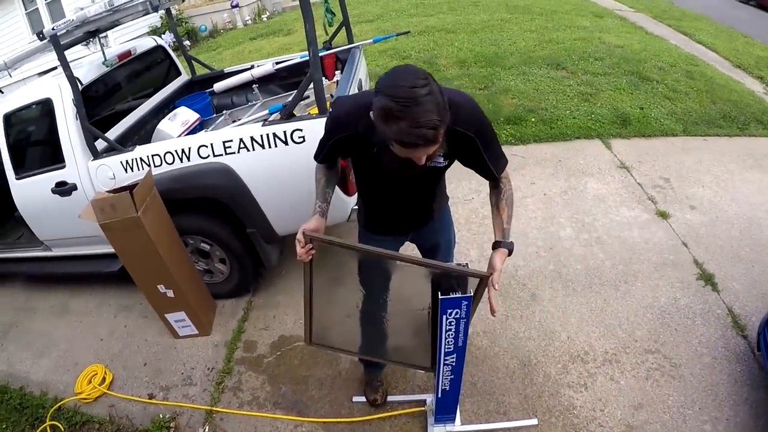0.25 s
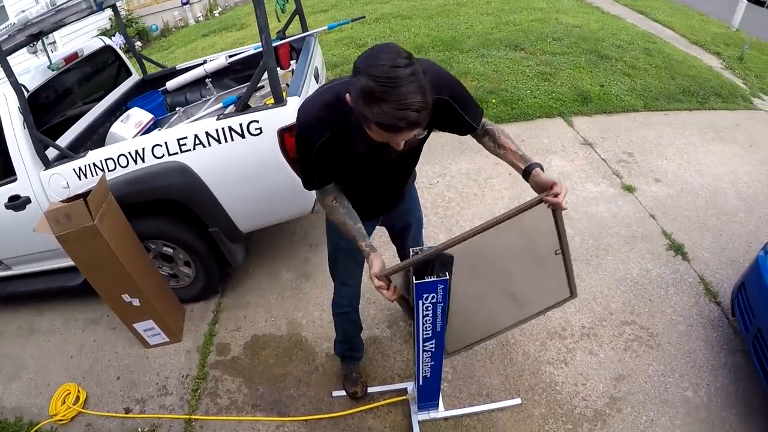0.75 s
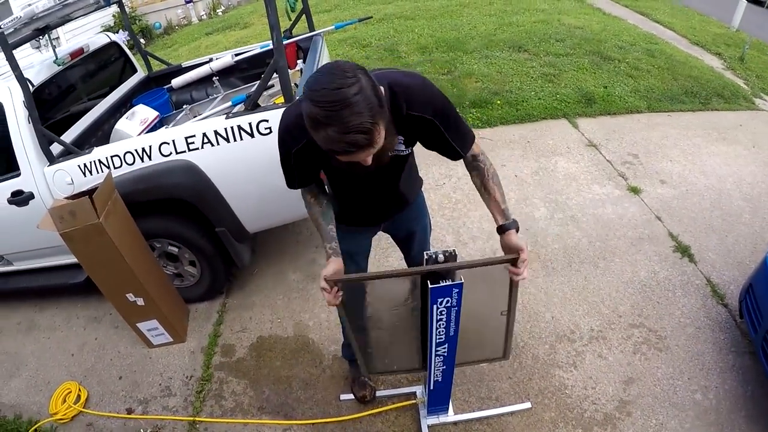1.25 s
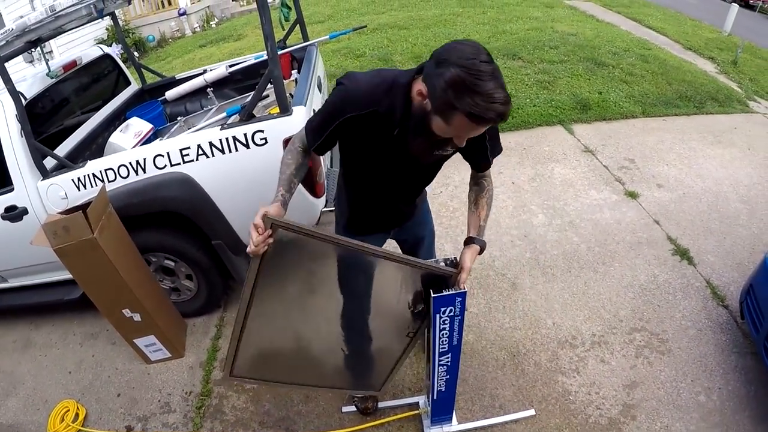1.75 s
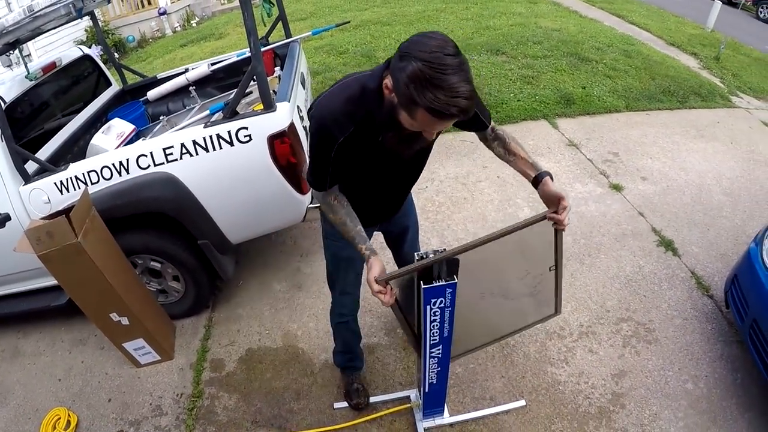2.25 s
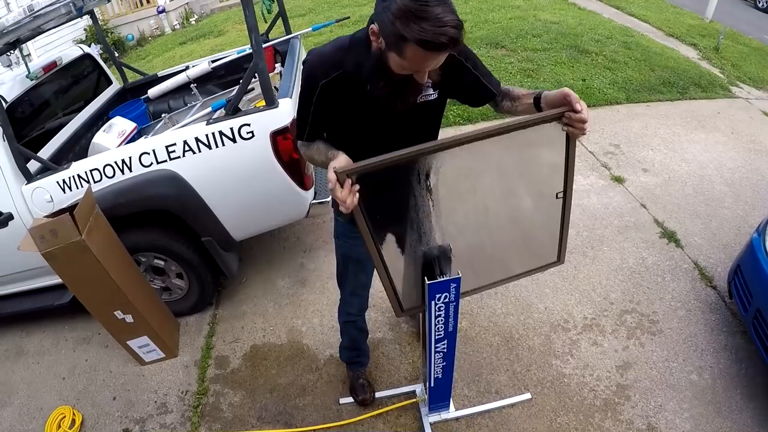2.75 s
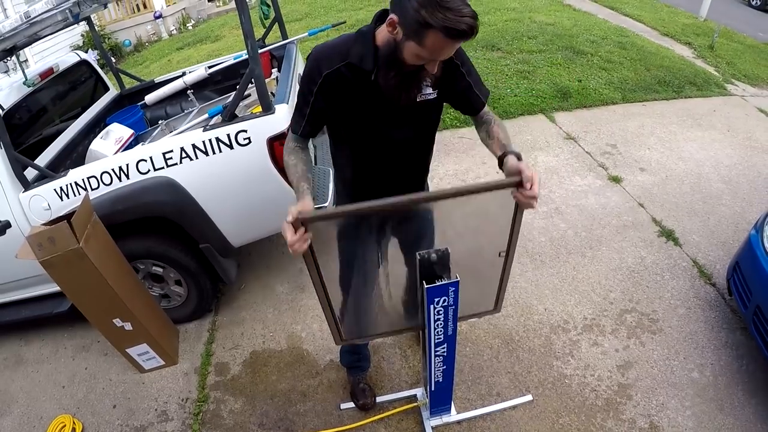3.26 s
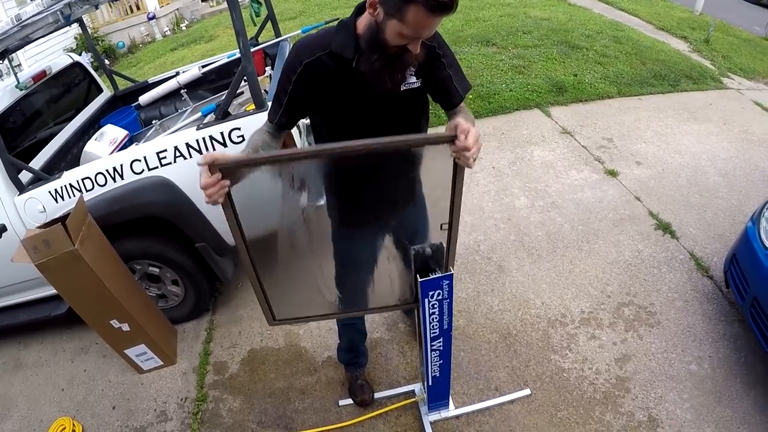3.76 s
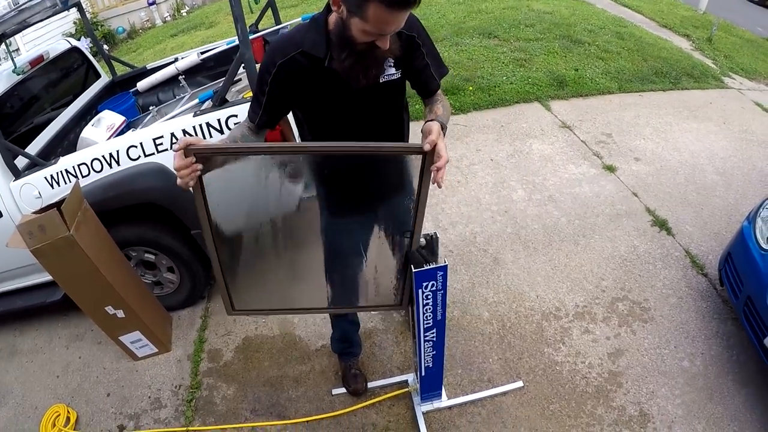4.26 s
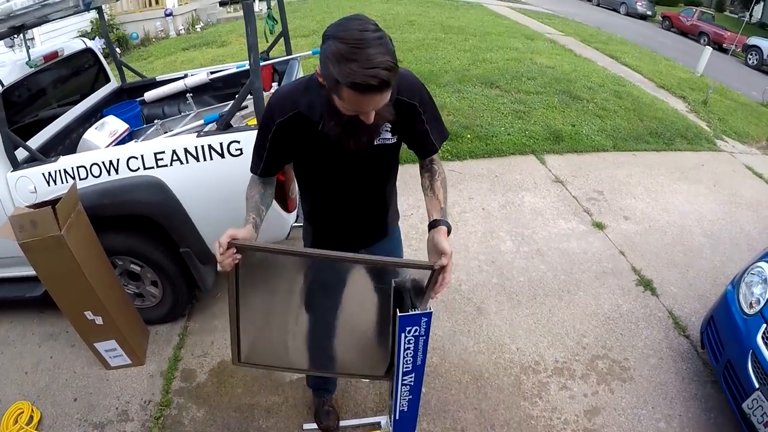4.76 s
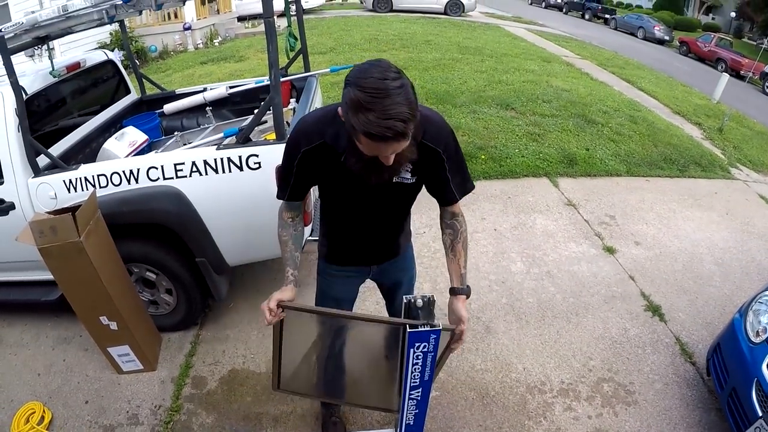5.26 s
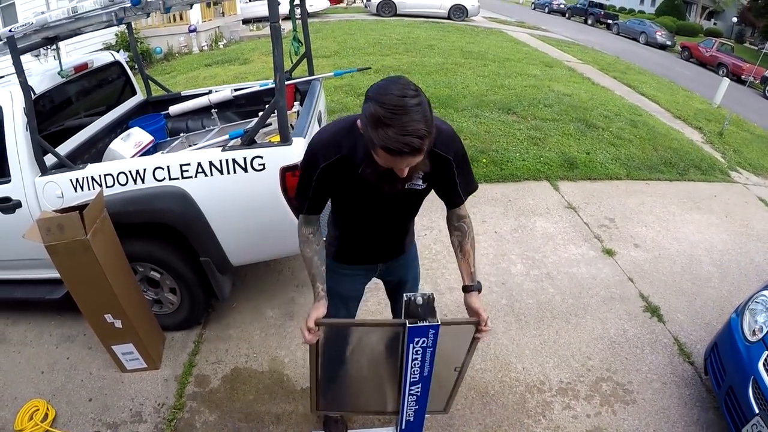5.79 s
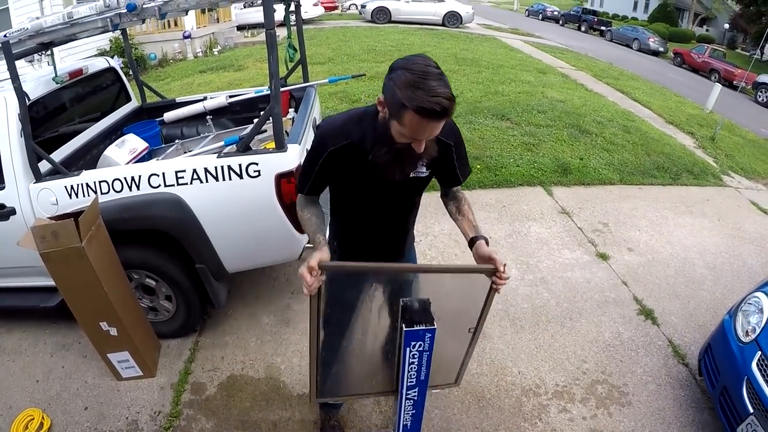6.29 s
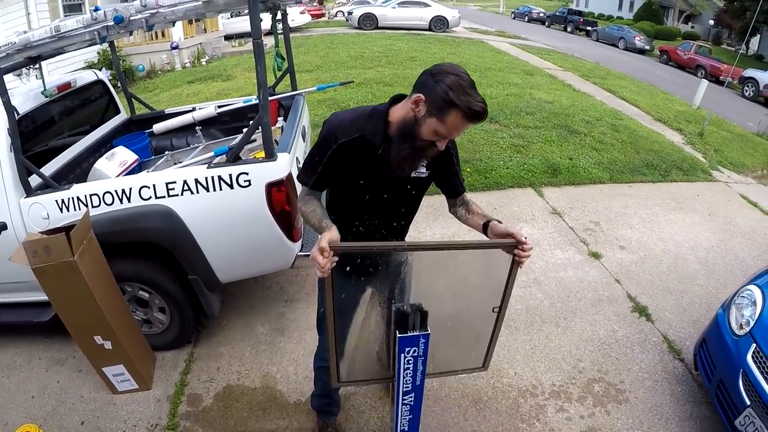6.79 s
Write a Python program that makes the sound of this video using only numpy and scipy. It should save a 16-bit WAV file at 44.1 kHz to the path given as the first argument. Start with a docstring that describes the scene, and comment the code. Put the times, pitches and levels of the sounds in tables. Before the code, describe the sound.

Rhythmic scrubbing of a wire screen begins at once, with dry-edged, scratchy swishes and short, quickly damped metallic knocks. In the first four seconds a few strokes give raspy zipping tones; afterwards the strokes turn faster, steadier and brighter. Low soft thumps come from the post. The microphone is close, in stereo, in open air with little bass and a faint street hum behind.

```python
"""A framed insect screen is pushed to and fro between the wet brushes of a scrubbing post on a driveway.
From the start, random bristle flicks hiss stroke by stroke over a quiet street hum, both made of shaped noise.
Almost at once the thin metal frame starts knocking on the post: noise bursts and fading sine waves.
From half a second to four seconds some strokes zip, with a tone at the mesh wires passed per second.
Dull low bumps of the post join before two seconds. A camera with two ports listens."""
import sys
import numpy as np
from scipy import signal
from scipy.fft import rfft, irfft, next_fast_len
from scipy.io import wavfile
from scipy.ndimage import uniform_filter1d

SR = 44100
rng = np.random.default_rng(int(sys.argv[2]) if len(sys.argv) > 2 else 0)


def invert_db(level):
    """Linear amplitude ratio for a level in decibels (20 dB per decade), elementwise."""
    return 10 ** (np.asarray(level, dtype=float) / 20)


def transcribe(u):
    """Save the signal u as a 16-bit wav file named by the first command-line argument.

    u: samples, shape (n,) or (channels, n), limited to [-1, 1]; the rate is SR.
    q: integer samples, one column per channel.
    """
    v = np.clip(np.atleast_2d(u).T, -1, 1)
    q = np.round(v * 32767).astype(np.int16)
    wavfile.write(sys.argv[1], SR, q)


N = 310023  # length in samples, about 7 s

# Strokes of the screen, one row each: start t/s, speeding up/s, slowing down/s, top strength/dB,
# frame body against the hiss at the top of the stroke/dB, firmness (1 pointed, 3 flat-topped)
STROKE_ROWS = [(-.2, 0.35, 0.14, -25.5, 1.5, 2.6), (.3, 0.14, 0.079, -33, -9, 3.6),
               (.5, 0.21, 0.24, -25, -1.5, 3.3), (1.07, 0.26, 0.27, -24.5, -0.2, 2.13),
               (1.56, 0.093, 0.17, -32.5, -1, 1.5), (1.87, .35, .22, -25, -1, 2.27),
               (2.33, .36, 0.48, -29, -6.5, 3.4), (3.18, 0.19, 0.079, -23, -5.5, 2),
               (3.5, 0.089, 0.18, -24, -3.5, 2.2), (3.81, 0.12, 0.1, -23, -5, 2.8),
               (4.05, 0.15, 0.13, -28.5, -3, 1.76), (4.361, .12, 0.19, -26.5, -8, 1.47),
               (4.66, .2, .15, -29, -4.5, 1.75), (5.02, 0.09, .25, -26, -7, 1.24),
               (5.39, 0.092, 0.16, -24, -7.5, 2.03), (5.692, 0.12, 0.16, -23, -4.5, 2.33),
               (5.991, 0.14, 0.19, -23, -5, 1.93), (6.35, .1, 0.14, -22, -5.5, 2.6),
               (6.631, .12, 0.17, -21, -8, 1.93), (6.95, 0.13, .15, -24.5, -9.5, 1.9)]
# First colour of the brushes, the main one in the first half: f/Hz, relative level/dB per Hz
FIRST_COLOUR = [(180, -32), (400, -21), (700, -17.5), (900, -14.5), (1150, -7.5), (1700, -3.5), (2050, -6),
                (2400, -7), (2950, -6.5), (3500, -3), (4300, -2), (5300, -6.5), (6400, -9.5), (9000, -19.5),
                (11500, -28.5), (13500, -28.5), (14900, -38)]
# Second colour of the brushes, strongest toward the end: f/Hz, relative level/dB per Hz
SECOND_COLOUR = [(180, -57), (300, -9), (371, -17), (540, -22.5), (800, -14), (958, -10), (1560, -6.5),
                 (1970, 0), (2280, -9), (3260, -8.5), (3720, -2.5), (4520, -1), (9140, -19.5),
                 (13500, -21.5), (14900, -32)]
# Share of the second colour: t/s, share (0-1)
SECOND_SHARE = [(0, 0.38), (2.4, 0.21), (3.3, 0.2), (4.5, 0.3), (5.4, 0.75), (7.03, 0.83)]
# Treble fizz against the hiss, before it follows the strength: t/s, level/dB
FIZZ = [(0, -1.2), (1.6, 1.1), (3.1, 3.5), (5.3, 1), (7.03, -2)]
# Street, as heard behind the camera's bass cut: f/Hz, relative level/dB per Hz
STREET_COLOUR = [(20, -21), (40, -27), (80, -26), (112, -47), (128, -32), (145, -5.5), (165, 4), (200, -1),
                 (285, -3.5), (296, -0.5), (310, -2.5), (600, -8), (1000, -9), (1700, -19), (3000, -36),
                 (5000, -60)]
# Knocks of the frame on the post: t/s, peak level/dB, centre of the ring f/Hz,
# treble level/dB, contact length/ms
KNOCK_ROWS = [(0.0535, -9.5, 1680, -14, 3.9), (0.192, -15.5, 1710, -17, 4.6), (0.3536, -23, 1720, -9, 2.4),
              (1.1477, -10, 1900, -7, 1.6), (1.298, -14, 1670, -25, 6.7), (1.7483, -15.5, 1860, -9, 3.1),
              (1.7825, -9, 1590, -9, 3.0), (2.6322, -6, 1850, -23, 3), (2.7259, -18.5, 1850, -20, 2.4),
              (3.481, -20, 1680, -7, 1.6), (3.517, -26.5, 1230, -2, 2.4), (3.6753, -17, 1830, -15, 4),
              (4.2305, -9, 2600, -18, 3.7), (4.304, -33, 1650, -16, 4), (4.6732, -18, 2110, -5, 0.85),
              (4.7162, -12.5, 1420, 1, 1.1), (4.7902, -9.5, 1750, -15, 3.4), (4.8357, -16.5, 1300, -4, 3.0),
              (4.8935, -19, 1780, -12, 2.5), (4.9542, -10, 1790, -8, 1.9), (4.997, -26.5, 1660, -12, 3.0),
              (5.0145, -28, 1790, -9, 2.3), (5.515, -27, 1740, -8, 2.1), (5.5667, -18, 1840, -3, 3.8),
              (5.6708, -26, 1770, -15, 3.4), (6.2806, -8, 2500, -14, 3.3), (6.7594, -25, 2860, -1, 2.1),
              (6.847, -11, 1800, 3, 3.2)]
# Ways the frame rings: f/Hz, relative level/dB, time to fade by 60 dB/s
FRAME_MODES = [(549, -1.5, 0.21), (1360, 2, 0.073), (1680, 11, 0.036), (1850, 3.5, 0.046), (2135, 7, 0.039),
               (2400, -1.5, 0.044), (2633, 1.5, 0.038), (3230, 8.5, 0.029), (3556, 5, 0.033),
               (3800, -16.5, 0.047), (5000, -6, 0.017), (5460, -33, .03), (7115, -29, 0.066)]
# Bristles in step on the mesh, one curve a zip: t/s, wires per second f/Hz, level/dB
ZIP_CURVES = [
    [(.6, 1055, -38), (.63, 1105, -40), (.67, 1160, -30)],
    [(.545, 761, -32), (.575, 918, -30), (.6, 1102, -40), (.645, 1503, -28.5), (.66, 1568, -30.5),
     (.7, 1550, -32), (.73, 1438, -28.5), (.77, 1247, -36), (.84, 890, -54)],
    [(.905, 633, -42), (.955, 640, -45)],
    [(1.2, 1254, -34), (1.31, 1453, -38), (1.36, 1350, -37), (1.42, 1555, -38), (1.48, 1370, -26)],
    [(2.08, 1241, -42), (2.13, 1295, -27), (2.17, 1233, -32), (2.2, 1325, -26.5), (2.235, 1280, -38),
     (2.26, 1323, -24), (2.3, 1206, -36), (2.34, 1190, -30)],
    [(3.3, 1089, -35), (3.358, 1302, -35), (3.378, 1215, -30.5), (3.4, 1150, -39)],
    [(2.06, 1850, -26), (2.18, 1955, -39), (2.32, 1850, -36)],
    [(3.56, 1600, -31), (3.63, 1766, -37), (3.65, 1700, -42)],
    [(3.89, 1230, -50), (3.935, 1250, -32), (3.95, 1200, -46)],
]
# How far the bristles are out of step: one value a zip (0-1)
OUT_OF_STEP = [.3, .12, .05, .95, .35, .1, .95, .95, .3]
# The post rocks on its feet or hums: t/s, starting level/dB, f/Hz, time to fade by 60 dB/s
BUMP_ROWS = [(1.783, -37.5, 550, 0.19), (2.046, -25.5, 182, 0.048), (3.561, -23, 162, 0.042),
             (5.285, -24, 182, .052), (6.118, -33.5, 362, 0.056), (6.741, -28.5, 375, .052)]
# Left port against right: f/Hz, louder/dB, leads/radians, likeness (0-1)
PORT_ROWS = [(150, -0.6, -0.13, 0.37), (450, -2.8, -0.43, 0.52), (800, -4.7, -0.14, 0.2),
             (1150, -9.5, 1.19, 0.57), (1500, -3.6, 1.38, 0.85), (2000, -0.9, 0.96, 0.86),
             (2400, 1.9, 0.47, 0.59), (2900, -1.4, 0.08, 0.86), (4300, 0.1, -0.12, 0.93),
             (5200, 1.2, -0.64, 0.71), (6500, 0.9, -0.15, 0.54), (7500, 1.3, -0.63, 0.27),
             (8600, -5.3, 0.26, 0.32), (10200, -13.3, 2.01, 0.14), (11200, -10.4, -0.05, 0.22),
             (12600, -2.5, -0.14, 0.56), (14500, 0.2, -0.3, 0.39)]

FLICKS_PER_S = 16000  # in each of two crowds of bristles
ENDS_DB = -17  # strength lost toward both ends of a stroke
REST_DB, BODY_REST_DB = -41, -44  # rustle left at the turns: hiss, frame body
BODY_EARLY_DB = 1.5  # the frame body leads: extra level before the top of a stroke
BODY_FIRMER = 1.34  # the body bites and stops more abruptly: factor on firmness
THUD_DB, DULL_THUD_DB = -25, -7.5  # thud against the peak: ordinary knocks, low-ringing knocks
DULL_UNDER_HZ = 1450  # knocks that ring below this thud much more


def evened(x):
    """Scales to an average strength (rms) of 1."""
    return x / np.sqrt(np.mean(x ** 2) + 1e-20)


def read_colour(points, hz):
    """Reads a colour table on a log-frequency axis."""
    f, value = np.transpose(points)
    return np.interp(np.log(hz + 1), np.log(f + 1), value)


def read_curve(points, t):
    """Reads a table of values over time."""
    return np.interp(t, *np.transpose(points))


def mix_in(mix, s, sound):
    """Mixes a sound in at s seconds."""
    part = mix[max(round(s * SR), 0):][:len(sound)]
    part += sound[:len(part)]


def step(hz, edge_hz, octaves):
    """Climbs smoothly from 0 to 1 across an edge in frequency."""
    return .5 + .5 * np.tanh(np.log2((hz + 1) / edge_hz) / octaves)


def patches(shape, bins, frames):
    """Random blotches over frequency and time, rms 1."""
    noise = rng.standard_normal(shape[::-1]).T
    wide = uniform_filter1d(noise, bins, 0)
    return evened(uniform_filter1d(wide, frames, 1))


def strokes(t):
    """Rubbing strength and the body against it, in dB: strokes swell and sink over the rustle at rest."""
    start, rise, fall, top_db, body_db, firm = np.transpose(STROKE_ROWS)[:, :, None]
    top_s = start + rise
    # distance from the top of the stroke: 0 at the top, 1 at either end
    early = np.maximum(top_s - t, 0) / rise
    late = np.maximum(t - top_s, 0) / fall
    hiss = invert_db(top_db + ENDS_DB * (early + late) ** firm)
    lead_db = BODY_EARLY_DB * np.minimum(early, 1)
    body_ends_db = ENDS_DB * np.minimum(early + late, 3) ** (firm * BODY_FIRMER)
    body = invert_db(top_db + body_db + lead_db + body_ends_db)
    hiss_db = 10 * np.log10((hiss ** 2).sum(0) + invert_db(REST_DB) ** 2)
    total_body_db = 10 * np.log10((body ** 2).sum(0) + invert_db(BODY_REST_DB) ** 2)
    return hiss_db, total_body_db - hiss_db


def brush(patchy_db=1.56, catch_db=0.12):
    """Thousands of bristle flicks a second, coloured by mesh and frame, in two unrelated crowds."""
    sizes = invert_db(1.2 * np.minimum(rng.exponential(1, (N, 2)), 4))
    happens = rng.random((N, 2)) < FLICKS_PER_S / SR
    flicks = happens * rng.standard_normal((N, 2)) * sizes
    hz, t, z = signal.stft(evened(flicks.T), SR, nperseg=512, noverlap=384)
    strength_db, body_db = strokes(t)

    share = read_curve(SECOND_SHARE, t)
    first_db = np.outer(read_colour(FIRST_COLOUR, hz), 1 - share)
    colour_db = first_db + np.outer(read_colour(SECOND_COLOUR, hz), share)
    # level both colours by their hiss region, so the stroke strength sets the hiss
    hiss = (hz > 3000) & (hz < 6500)
    colour_db -= 10 * np.log10(np.sum(invert_db(colour_db[hiss]) ** 2, 0) / len(hz))

    # the body also grows with the second colour
    body = np.outer(1 - step(hz, 2600, 0.68), body_db + 3.2 * share)
    # the fizz swells less than the hiss
    fizz_db = read_curve(FIZZ, t) - 0.095 * (strength_db + 39.5)
    tips = np.outer(step(hz, 8100, 0.3), fizz_db)
    # tufts catch and let go: narrow blotches, then wide ones
    chance_db = patchy_db * patches(z[0].shape, 6, 8) + catch_db * patches(z[0].shape, 90, 5)
    z = z * invert_db(colour_db + body + tips + chance_db)
    shaped = signal.istft(z, SR, nperseg=512, noverlap=384)[1][:, :N]
    return shaped * invert_db(np.interp(np.arange(N) / SR, t, strength_db))


def street(patchy_db=2.0):
    """Far traffic and air as coloured, blotchy noise, partly alike at both ports."""
    hz = np.fft.rfftfreq(2048, 1 / SR)
    a, b, c, d = rng.standard_normal((N // 512 + 6, len(hz), 4)).T
    shared, separate = a + 1j * b, c + 1j * d
    # the ports agree more in the deep bass
    same = (0.35 + .4 * (1 - step(hz, 50, .5)))[:, None]
    z = np.array([shared, same * shared + np.sqrt(1 - same ** 2) * separate])
    z *= invert_db(read_colour(STREET_COLOUR, hz)[:, None] + patchy_db * patches(a.shape, 8, 10))
    hum = signal.istft(z, nperseg=2048, noverlap=1536)[1][:, :N]
    return invert_db(np.array([[-46.5], [-45.5]])) * evened(hum)  # left, right level in dB


def band(x, lo_hz, hi_hz):
    """Keeps the part between two frequencies, with steep edges, and scales its peak to 1."""
    y = signal.sosfilt(signal.butter(4, [lo_hz, hi_hz], "band", fs=SR, output="sos"), x)
    return y / abs(y).max()


def knock(row, draw, spread_db=3.5, crack_db=-1.5, crack_t60=0.05, thud_t60=0.09):
    """A short contact gives a bright crack and a dull thud; the frame rings most near the centre pitch."""
    s, peak_db, centre_hz, treble_db, contact_ms = row
    ordinary = step(centre_hz, DULL_UNDER_HZ, 0.044)
    thud_db = DULL_THUD_DB + (THUD_DB - DULL_THUD_DB) * ordinary
    hz, mode_db, t60 = np.transpose(FRAME_MODES)
    t = np.arange(len(draw)) / SR

    # hard blows wake more modes and crack more
    reach_octaves = np.clip(2.27 + 0.085 * peak_db, .15, 2)
    distance = np.log2(hz / centre_hz) / reach_octaves
    near_db = np.where(hz < 900, thud_db, -6.0 * distance ** 2)
    mode_db = mode_db + spread_db * draw[:len(hz)] + np.where(hz > 3800, treble_db, near_db)
    rise = 1 - np.exp(-(t * 2000 / contact_ms) ** 2)  # longer contact, softer start
    phase = draw[-len(hz):, None]
    swing = np.sin(2 * np.pi * (np.outer(hz, t) + phase))
    fade = invert_db(mode_db[:, None] - 60 * t / t60[:, None])
    ring = rise * (fade * swing).sum(0)

    burst = draw[::-1] * rise * invert_db(-60 * t / crack_t60)
    crack = invert_db(crack_db + 0.13 * peak_db) * band(burst, 1345, 3500)
    crack += invert_db(treble_db) * band(burst, 3570, 6000)
    thud = invert_db(thud_db) * band(draw * rise * invert_db(-60 * t / thud_t60), 300, 1260)
    sound = ring / abs(ring).max() + crack
    # start 1 ms ahead of the listed time
    return s - .001, invert_db(peak_db) * (sound / abs(sound).max() + thud)


def mesh_zip(rows, rough, second_db=-12, smooth_s=0.005, rasp_db=0.5, rasp_s=0.001):
    """Bristles cross wires nearly in step: a tone and its octave, broken up as tufts fall out of step."""
    s, hz, level_db = np.transpose(rows)
    t = np.arange(s[0], s[-1], 1 / SR)
    chance = rng.standard_normal((4, len(t)))
    slow = [1, -np.exp(-1 / (smooth_s * SR))]
    a, b = evened(signal.lfilter([1], slow, chance[:2]))
    # tufts at other speeds: a wide rasp around the tone
    fast = [1, -np.exp(-1 / (rasp_s * SR))]
    smoothed = signal.lfilter([1], fast, chance[2:])
    c, d = evened(signal.lfilter([1], fast, smoothed))
    wobble = a + 1j * b + invert_db(rasp_db) * (c + 1j * d)
    tufts = np.sqrt(1 - rough) + np.sqrt(rough / 2) * wobble
    turn = np.exp(2j * np.pi * np.cumsum(np.interp(t, s, hz)) / SR)
    octave = invert_db(second_db) * turn ** 2
    tone = np.sqrt(2) * (tufts * (turn + octave)).real
    return s[0], tone * invert_db(np.interp(t, s, level_db)) * signal.windows.tukey(len(t), .3)


def bump(s, level_db, hz, t60):
    """The post rocks or hums: a low sine wave that starts softly and dies away."""
    t = np.arange(5000) / SR
    rise = 1 - np.exp(-t / 0.0031)
    return s, invert_db(level_db - 60 * t / t60) * np.sin(2 * np.pi * hz * t) * rise


def ports(near, other, cut_hz=140):
    """Two ports in one housing colour and shift the sound; the right partly hears other bristles; bass is cut."""
    size = next_fast_len(N + 4096)
    hz = np.fft.rfftfreq(size, 1 / SR)
    columns = np.transpose(PORT_ROWS)
    balance_db, lead, alike = (np.interp(hz, columns[0], column) for column in columns[1:])
    left, right = invert_db(balance_db / 2), invert_db(-balance_db / 2)
    # gain of the mean of both ports, divided out so that only their difference stays
    both = np.sqrt(left ** 2 + right ** 2 + 2 * alike * left * right * np.cos(lead)) / 2
    bass_cut = 1 + (cut_hz / (hz + 1)) ** 6
    a, b = rfft([near, other], size) / both / bass_cut
    heard_left = left * a * np.exp(.5j * lead)
    blend = alike * a + np.sqrt(1 - alike ** 2) * b
    heard_right = right * blend * np.exp(-.5j * lead)
    return irfft([heard_left, heard_right], size)[:, :N]


def scene():
    """Brushes, knocks, zips and bumps pass through the ports; the street is added behind them."""
    near, other = brush()
    hum = street()
    frame = np.zeros(N)
    for row, draw in zip(KNOCK_ROWS, rng.standard_normal((len(KNOCK_ROWS), 6000))):
        mix_in(frame, *knock(row, draw))
    for rows, rough in zip(ZIP_CURVES, OUT_OF_STEP):
        mix_in(frame, *mesh_zip(rows, rough))
    for row in BUMP_ROWS:
        mix_in(frame, *bump(*row))
    return ports(near + frame, other + 0.62 * frame) + hum


def roll_off(x):
    """The treble ends steeply here."""
    return signal.sosfilt(signal.butter(12, 15070, fs=SR, output="sos"), x)


def record(dry):
    """Turns the finished mix into the sound that is written out."""
    return roll_off(dry)


dry = scene()
out = record(dry)
transcribe(out)
```